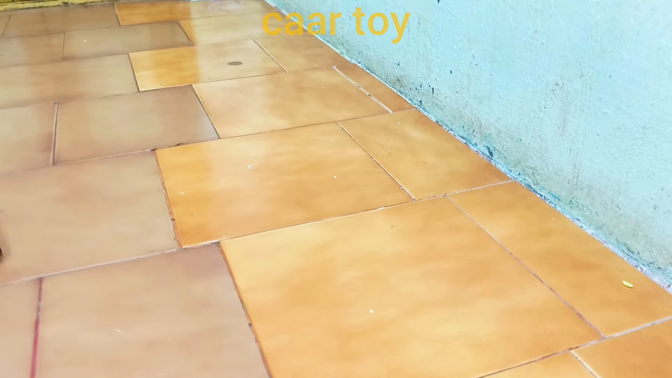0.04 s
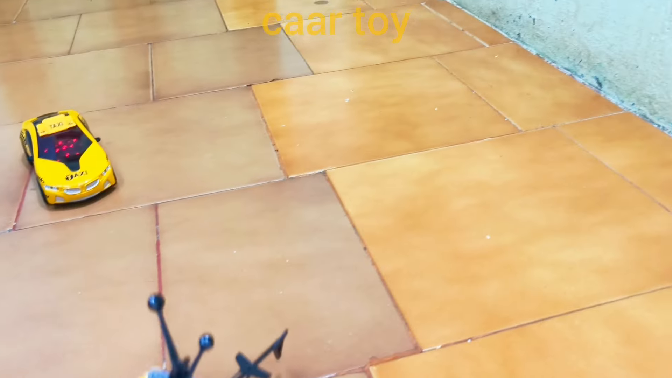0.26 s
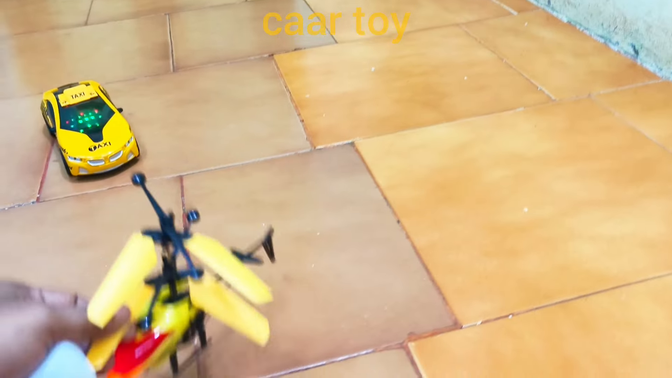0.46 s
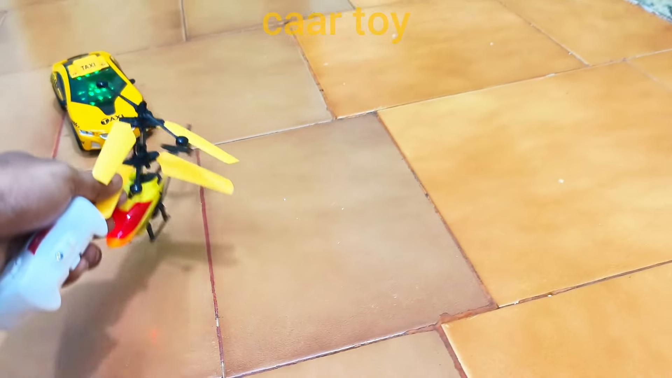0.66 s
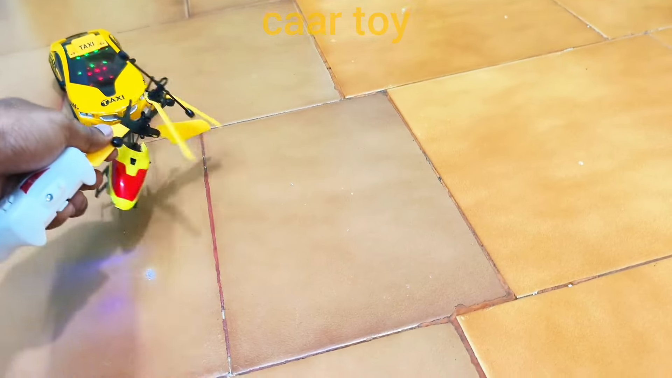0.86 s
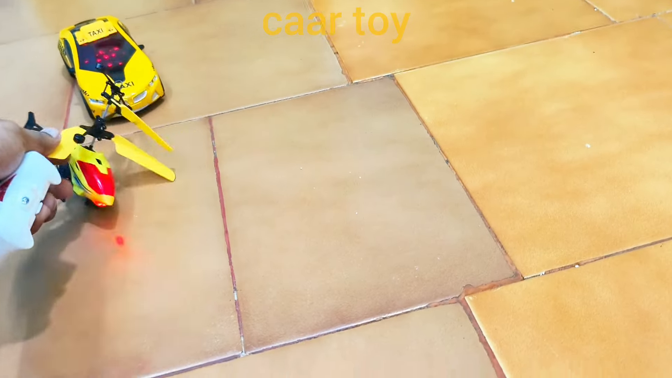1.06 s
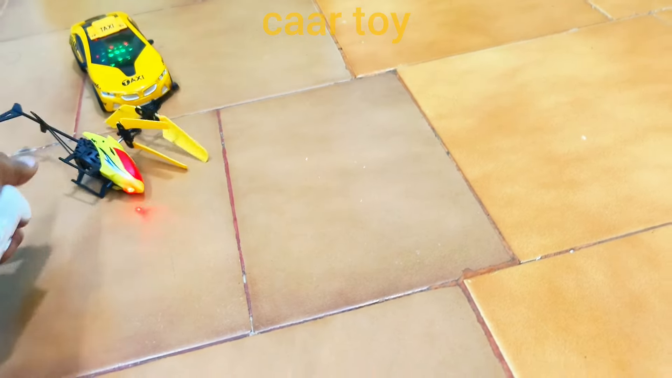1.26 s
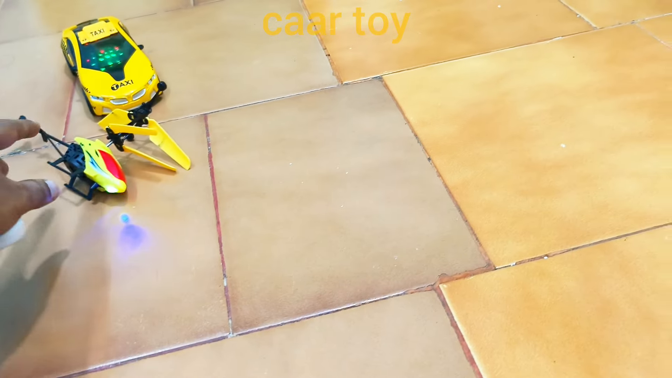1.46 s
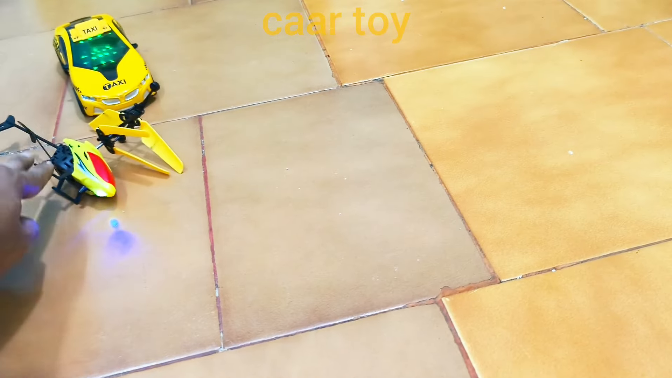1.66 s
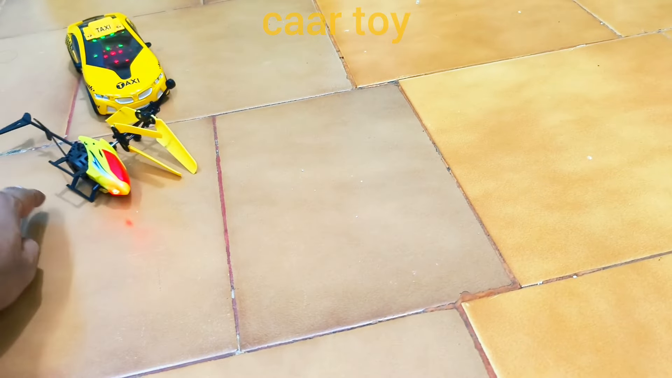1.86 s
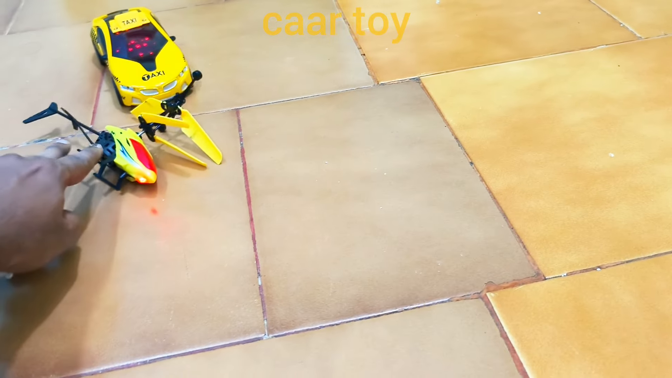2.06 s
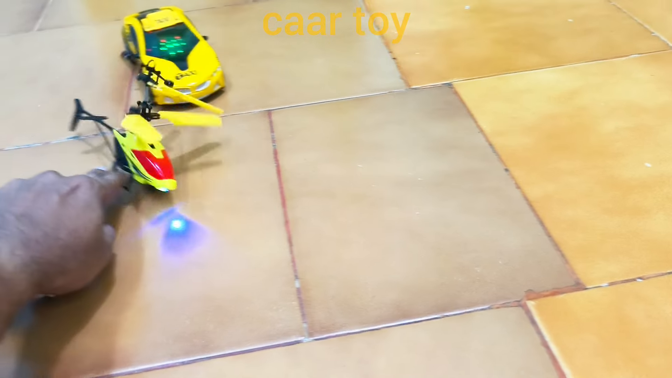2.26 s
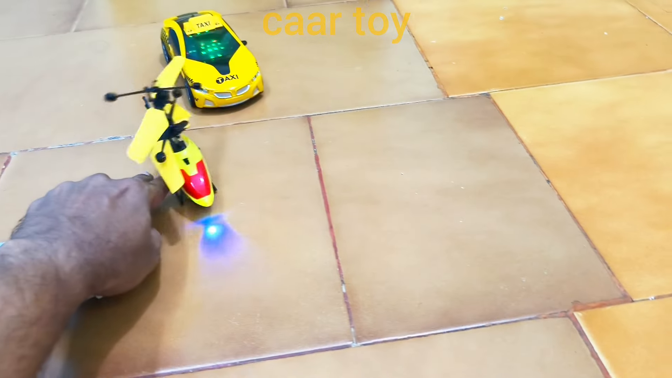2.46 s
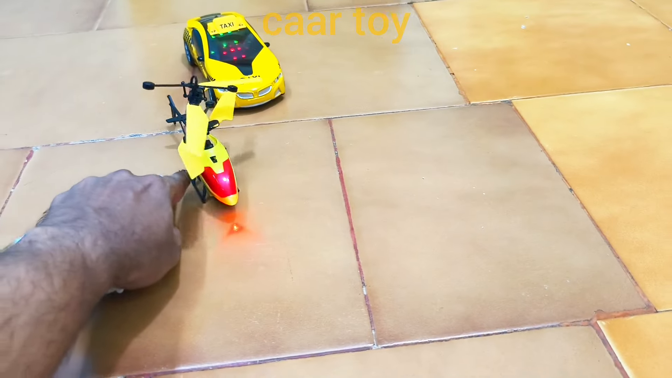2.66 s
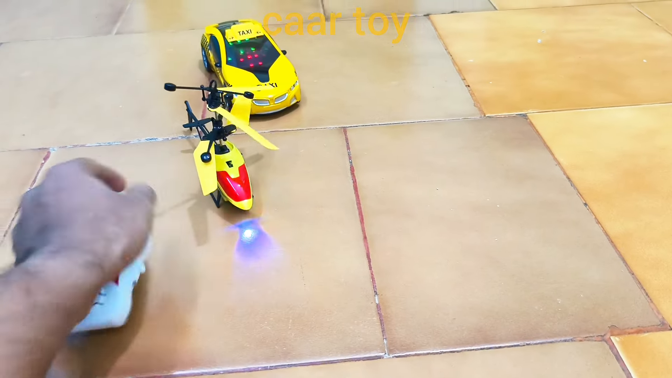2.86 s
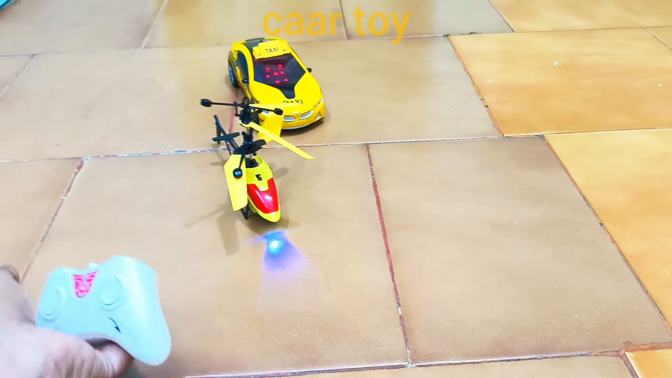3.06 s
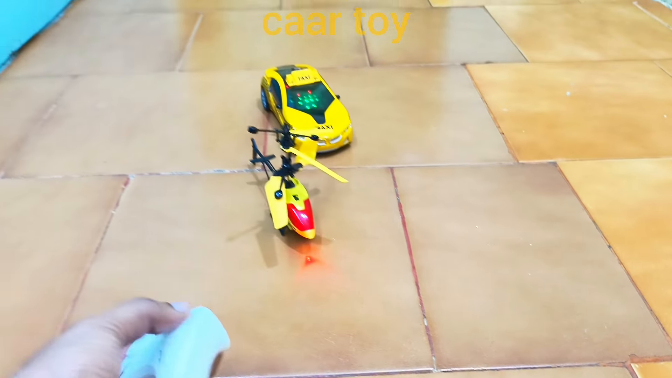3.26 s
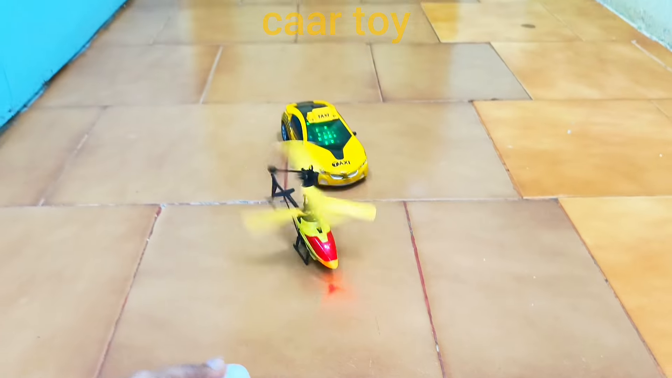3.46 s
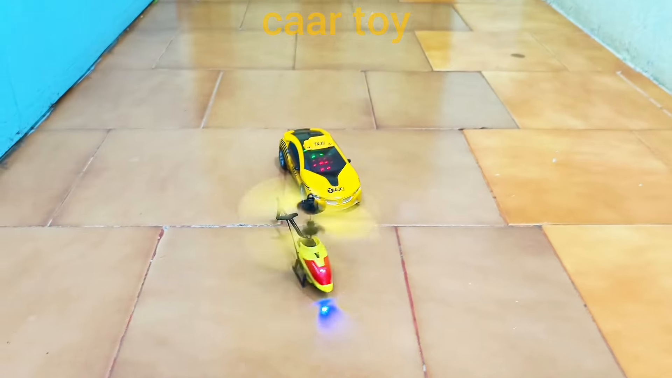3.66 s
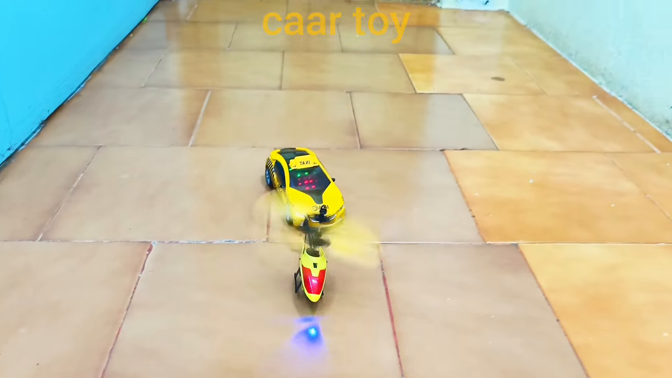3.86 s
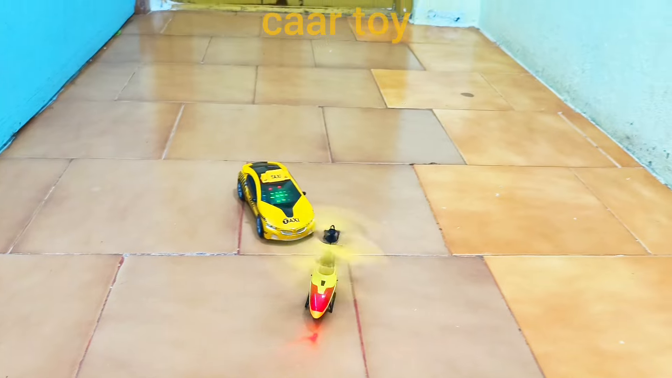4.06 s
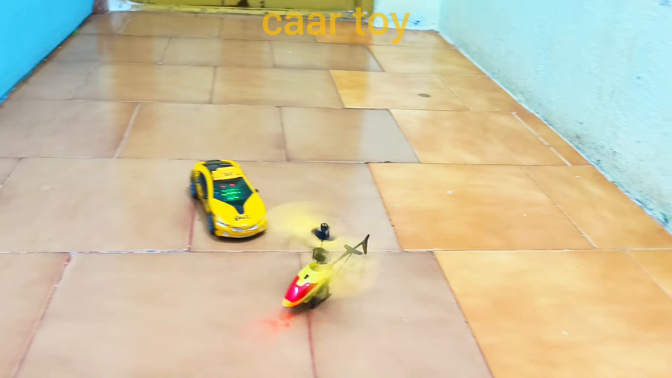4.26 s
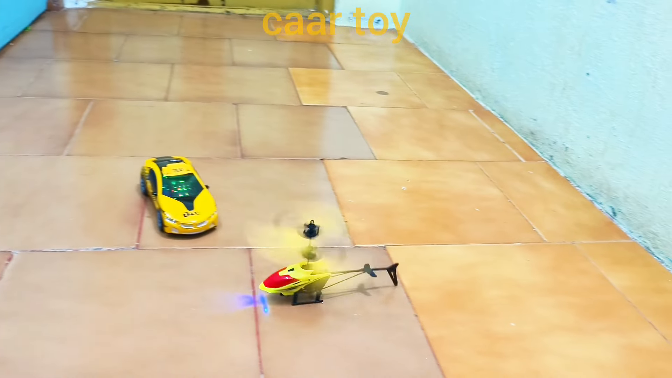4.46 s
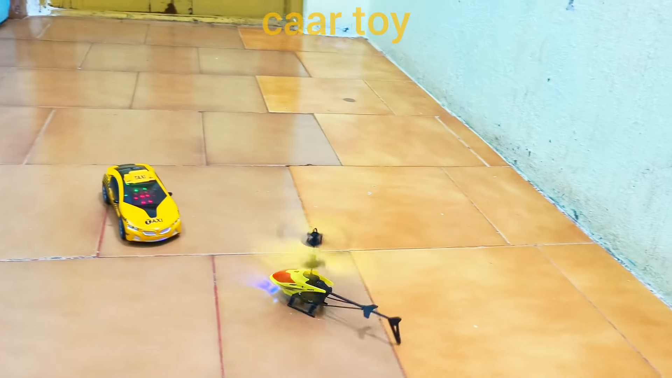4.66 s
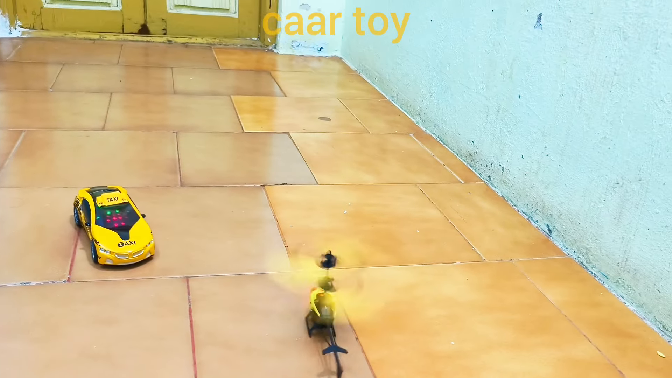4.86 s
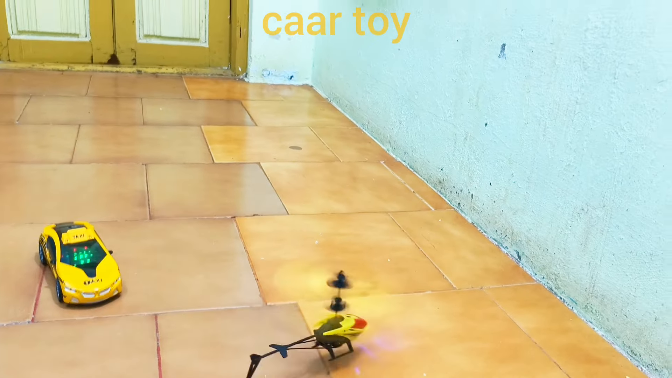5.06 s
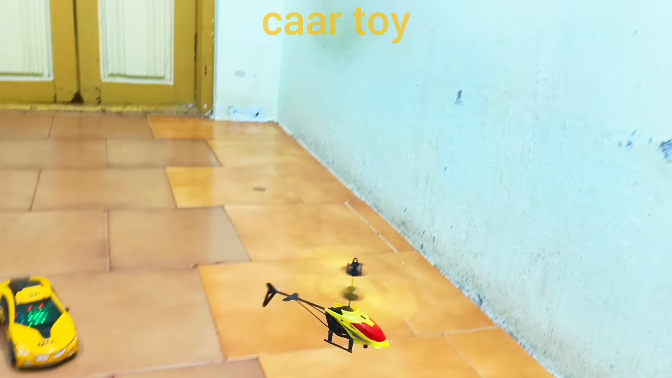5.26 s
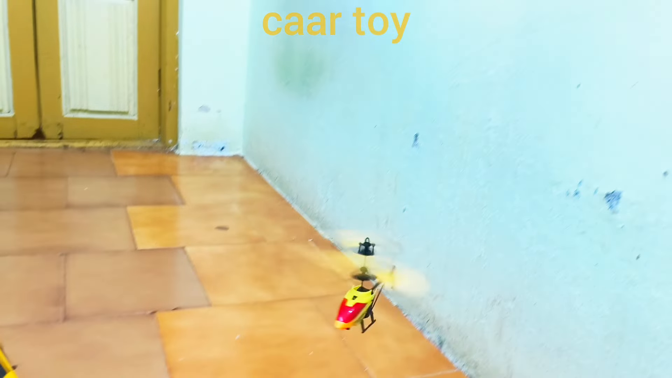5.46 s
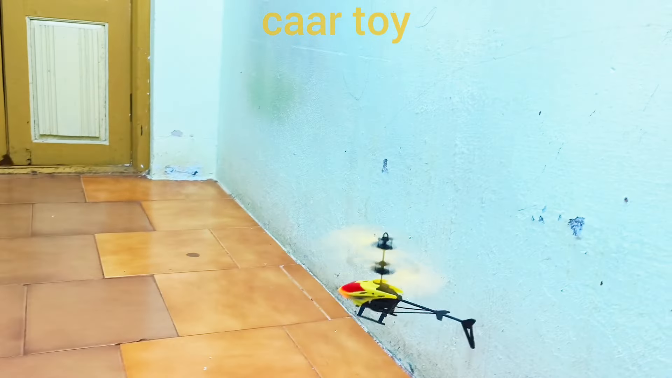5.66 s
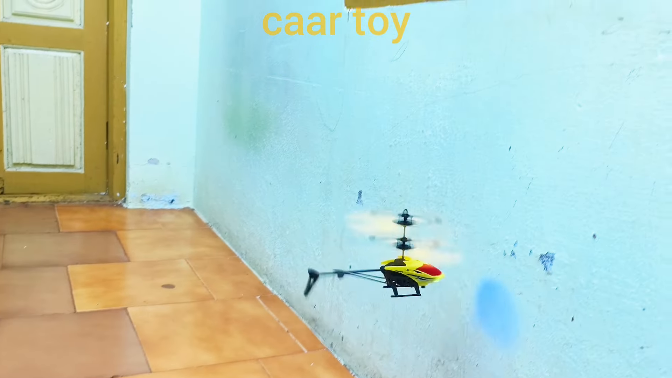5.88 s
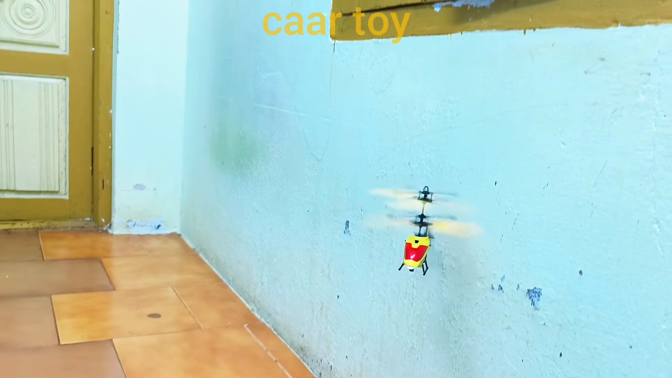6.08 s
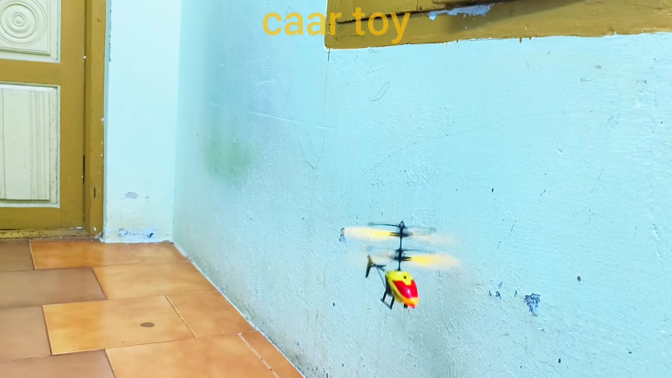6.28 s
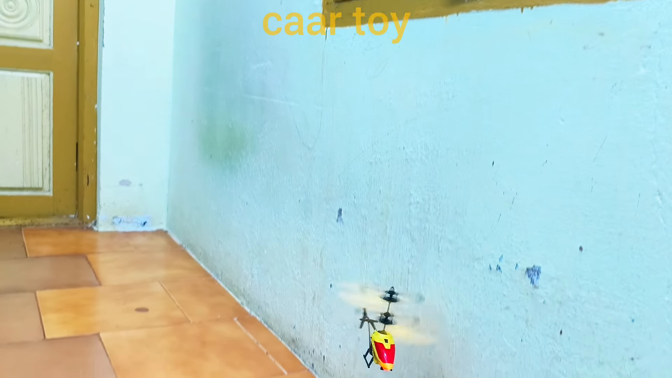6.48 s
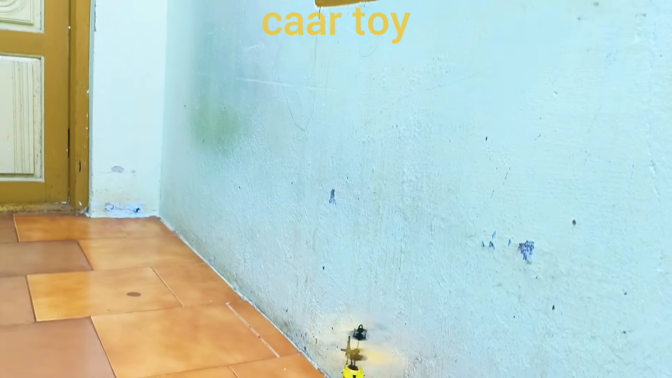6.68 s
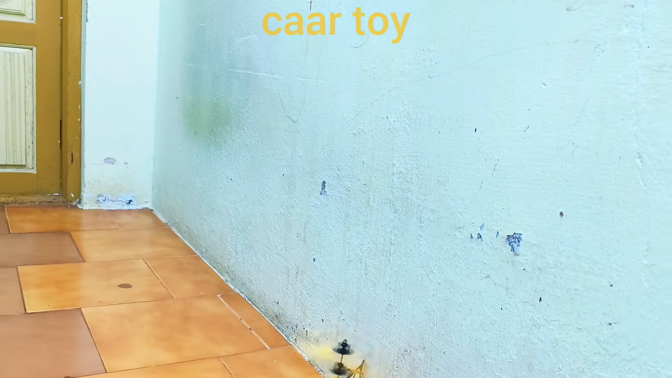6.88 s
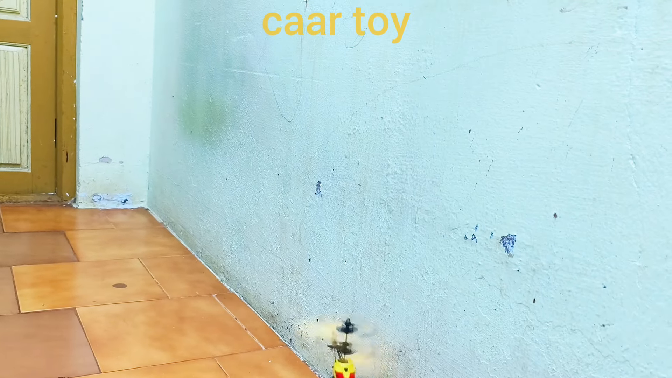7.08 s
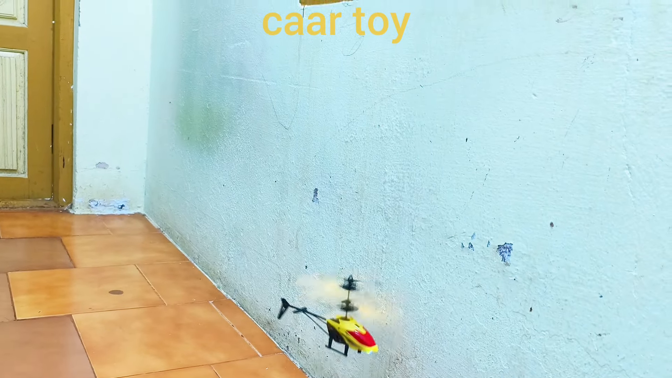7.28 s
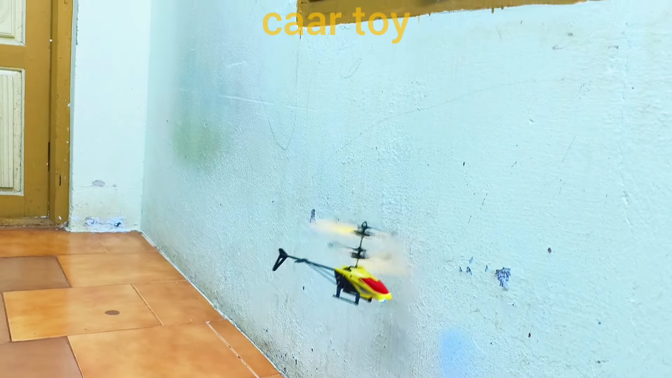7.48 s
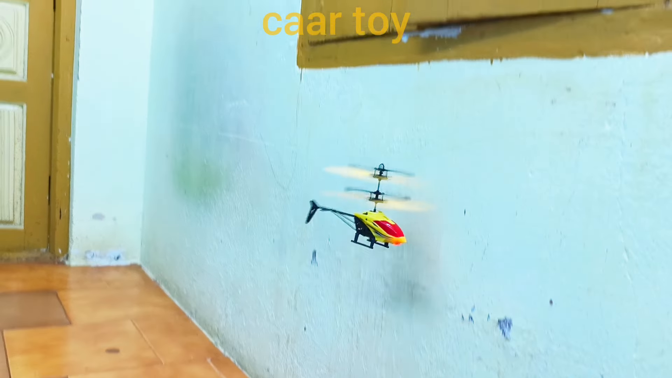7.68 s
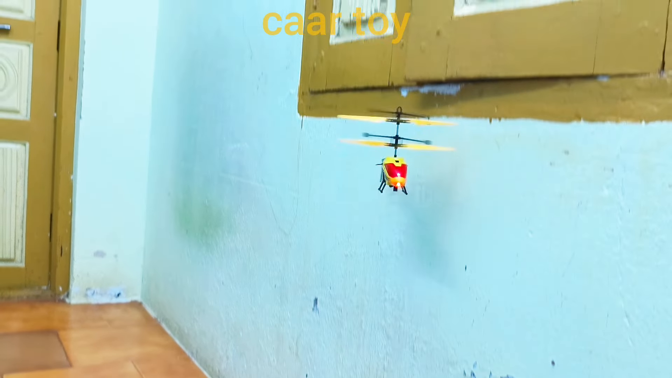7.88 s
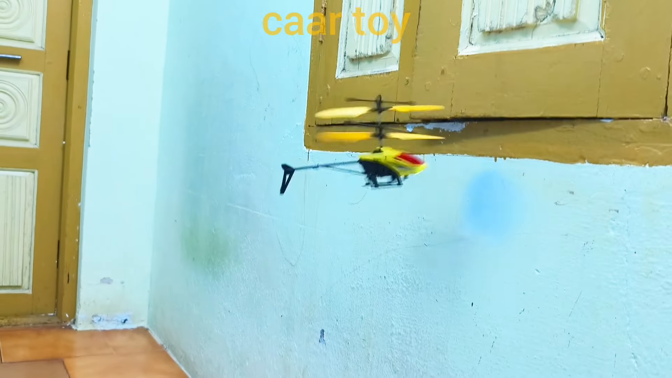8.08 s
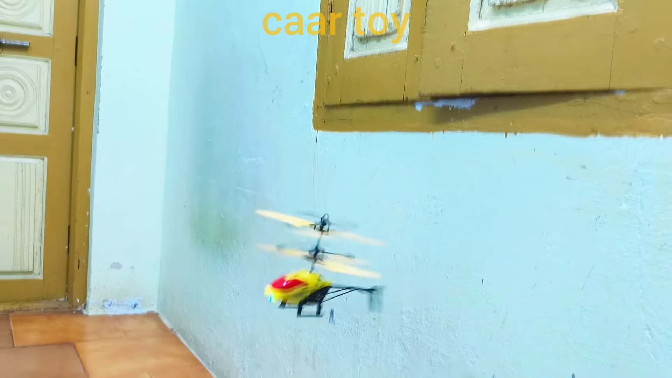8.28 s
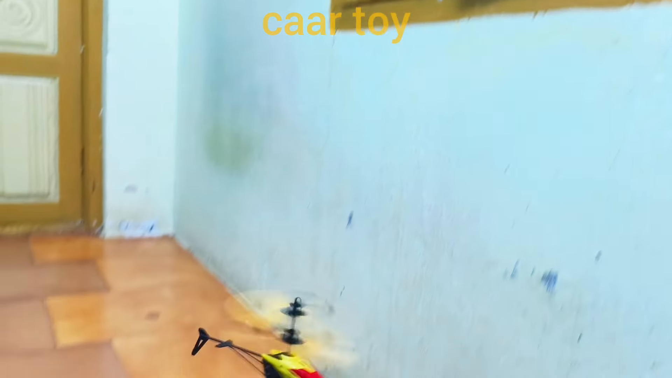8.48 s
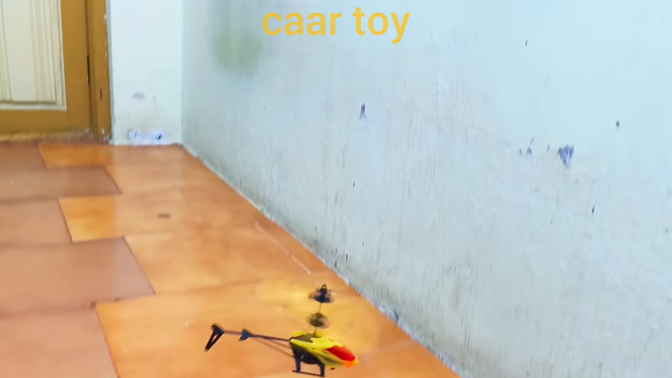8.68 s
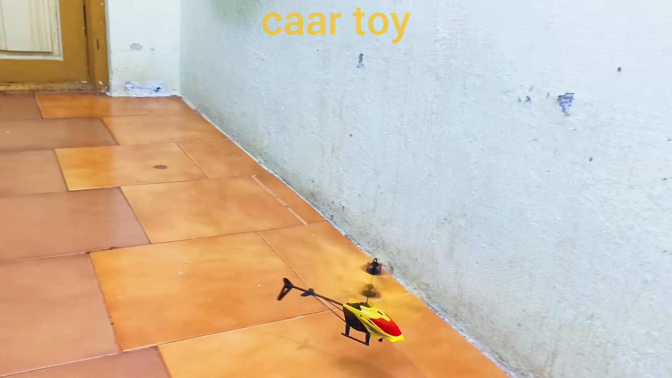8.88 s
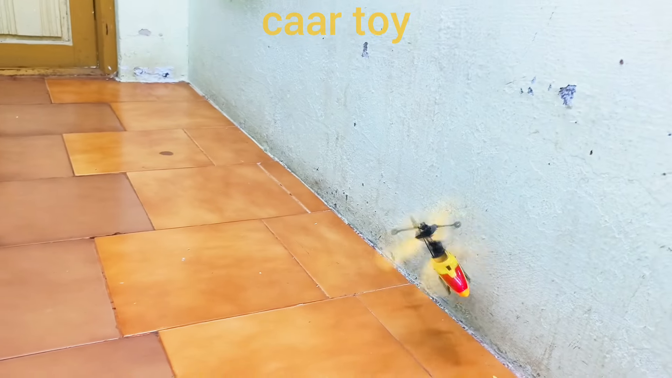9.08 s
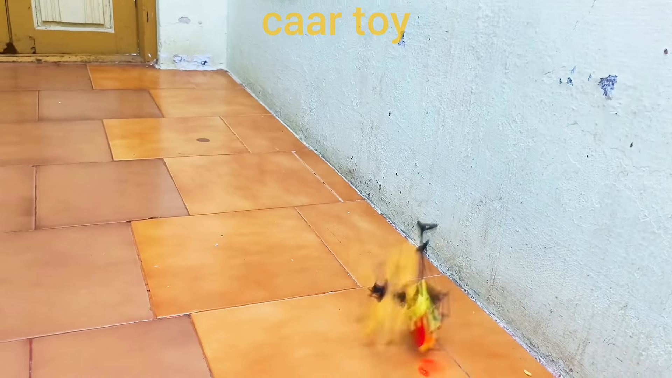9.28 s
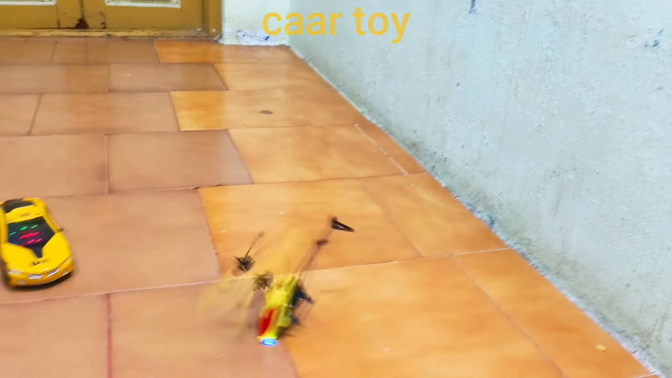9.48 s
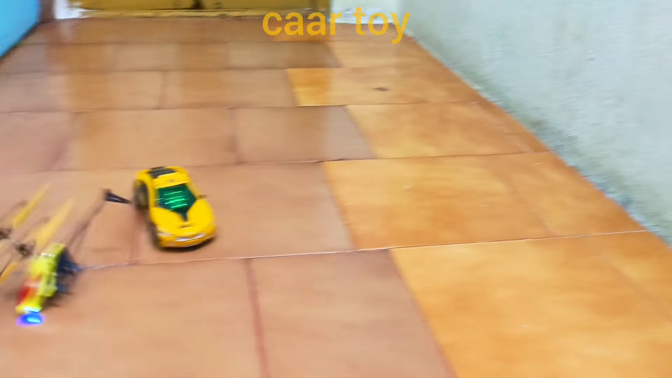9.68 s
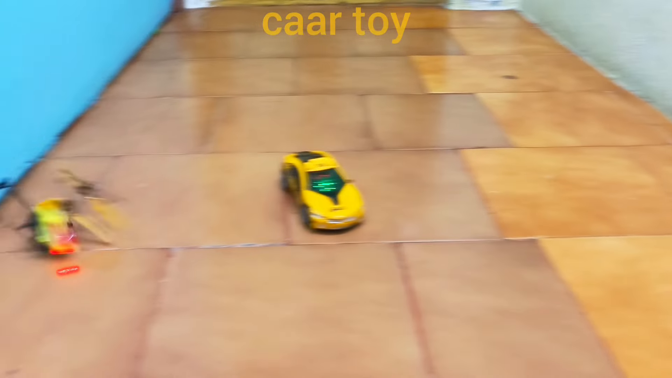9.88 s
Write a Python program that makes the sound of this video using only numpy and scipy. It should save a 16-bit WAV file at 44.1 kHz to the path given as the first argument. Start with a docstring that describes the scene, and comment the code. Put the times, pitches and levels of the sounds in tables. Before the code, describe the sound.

A toy helicopter is handled with plastic clicks, then whines and chatters in surges, its blades striking a wall before it crashes.

```python
"""Toy helicopter in a bare corridor

A toy helicopter is set down and handled on a tiled floor, then spins up and hovers in surges.
Two small motors drive the rotors through plastic gears that whine and chatter. The blades tick
against the wall, strike a shutter and the floor, and the toy tumbles in close at the end.
A low hum and a few far knocks fill the house."""
import sys
import numpy as np
from scipy import signal
from scipy.fft import rfft, irfft, next_fast_len
from scipy.io import wavfile

SR = 44100
rng = np.random.default_rng(int(sys.argv[2]) if len(sys.argv) > 2 else 0)


def persist_wave(psi):
    """Save psi, clipped to +-1, as 16-bit WAV."""
    counts = np.round(np.clip(psi, -1, 1) * 32767).astype(np.int16)
    wavfile.write(sys.argv[1], SR, np.atleast_2d(counts).T)


N = 437913
T = np.arange(N) / SR

START_S, PINION_TEETH, GEAR_RATIO = 3.44, 8, 5.7
# whine and buzz over the gear level, and their change with shaft rate
WHINE_DB, WHINE_DB_PER_HZ, STRAIN_DB_PER_HZ = 3.2, .04, .05
BUZZ_DB, BUZZ_DB_PER_HZ = -12.5, -0.064
# backlash roughens the whine; within about TIGHT_HZ of top speed the teeth stay pressed and whistle
LOOSE_SHARE, TIGHT_SHARE, TIGHT_HZ, TIGHT_DB = .73, .2, 3.5, 3.8
# fader ride of the gear train: time_s, level_db
GEAR_FADER = [(3.42, -38), (3.5, -29.5), (3.65, -22.5), (3.85, -27.5), (4.4, -25.5), (6.2, -28), (7.7, -28),
              (8.45, -32.7), (9.5, -32), (9.93, -30.5)]
# steering, upper motor's speed over the lower's: time_s, speed_ratio
STEERING = [(3.85, 1.01), (4.3, 1.126), (4.85, 1.09), (5.15, 1.025), (5.75, 0.99), (6.2, 1.02), (6.55, .98),
            (8.6, 1.003), (9.05, 0.99), (9.6, 1.03)]
# how the airframe radiates the whine: freq_hz, gain_db
AIRFRAME_EQ = [(900, -3.5), (1300, -8.5), (1750, -7), (2100, -10), (2600, 4), (3300, 0.5), (3900, -8),
               (4550, -0.5), (5800, -9.5), (7500, 6.5), (9100, 0.5), (11500, 0), (14000, -4.5)]
# bright chatter of the teeth: freq_hz, gain_db
CHATTER_EQ = [(3000, -21), (3500, -8.5), (5000, -0.5), (6200, 5), (7600, 4), (9700, 5), (11800, -1),
              (14300, 11.5), (16000, 2.5)]
# midrange buzz of the teeth: freq_hz, gain_db
BUZZ_EQ = [(1000, -23), (1600, -3.5), (2100, -7.5), (2500, 2), (2850, -2.5), (3150, -13), (4000, -10)]


def helicopter():
    """Two motors run a little apart; their gears whine and chatter while the blades stir the air."""
    hz, strain_hz, extra_db = motor_speed()
    (split,), (gear_db,) = curves(STEERING), curves(GEAR_FADER)
    from_full_hz = hz - hz.max()
    tight = np.exp(from_full_hz / TIGHT_HZ)
    slack = np.clip(LOOSE_SHARE + (TIGHT_SHARE - LOOSE_SHARE) * tight, 0, 1)
    whine_db = gear_db + extra_db + WHINE_DB + WHINE_DB_PER_HZ * from_full_hz
    whine_db += STRAIN_DB_PER_HZ * strain_hz + TIGHT_DB * tight
    # turns made by each motor shaft
    lower = np.cumsum(hz * (1 + .004 * slack * walk(14))) / SR
    upper = np.cumsum(hz * split * (1 + .004 * slack * walk(10))) / SR
    tones = undb(whine_db) * colour(whine(lower, slack) + undb(-4.5) * whine(upper, slack), AIRFRAME_EQ)
    teeth = tooth_clicks(lower, scatter_db=4.5, throb=0.37)
    teeth += tooth_clicks(upper, scatter_db=5.0, throb=0.067)
    teeth = unit(teeth) + undb(-14.5) * (clatter(lower) + clatter(upper))
    chatter = undb(gear_db + .5) * colour(teeth, CHATTER_EQ)
    buzz = undb(gear_db + BUZZ_DB + BUZZ_DB_PER_HZ * from_full_hz) * colour(teeth, BUZZ_EQ)
    wash = blade_wash(lower / GEAR_RATIO, from_full_hz)
    # a low tone sings along near top speed
    low_tone = undb(-52 + 3 * walk(4)) * (hz / hz.max()) ** 8 * np.sin(2 * np.pi * lower * 8 / 3)
    power = np.clip((T - START_S) / 0.003, 0, 1)
    toy = power * (tones + chatter + buzz + wash + drones() + low_tone)
    direct_whine = undb(-17) * power * tones
    return corridor(toy, wet_db=8.5, tails=4) + direct_whine


FIRST_HZ, INERTIA_S = 50, .107  # shaft rate at switch-on; lag of the rotors
# the shutter jam and a 0 dB strike each pull the target rate down for BRAKE_S
JAM_S, JAM_LOSS_HZ, STRIKE_LOSS_HZ, BRAKE_S = 8.046, 117, 25, .07
# throttle moves: start_s, target_shaft_hz, extra_whine_db
THROTTLE_CUES = [(3.439, 119.9, -2), (3.589, 200, .5), (3.84, 178, -1), (3.94, 155, -1.5),
                 (4.325, 172, -1.5), (4.943, 215.5, 0), (5.36, 172, -3), (5.52, 217.5, 2.5), (5.83, 207, 0),
                 (5.99, 162, -2), (6.365, 218, -2.5), (7.82, 200, -3), (7.95, 175, -2), (8.118, 147.6, 1),
                 (8.264, 219.2, 0), (9.093, 182, 0), (9.247, 204, -3), (9.74, 174, -2)]


def motor_speed():
    """Shaft rate trails the throttle and strikes brake it; gives rate, climb still to go, extra whine."""
    starts, targets_hz, extras_db = np.transpose(THROTTLE_CUES)
    step = np.searchsorted(starts, T)
    target_hz = np.r_[FIRST_HZ, targets_hz][step]
    brakes = [(JAM_S, JAM_LOSS_HZ)] + [(s, STRIKE_LOSS_HZ * undb(db)) for s, _, db, _, _ in ROTOR_HITS]
    braking_hz = sum(loss * ((T > s) & (T < s + BRAKE_S)) for s, loss in brakes)
    hz = lag(target_hz - braking_hz, INERTIA_S)
    strain_hz = lag(np.maximum(target_hz - hz, 0), INERTIA_S)
    return hz, strain_hz, lag(np.r_[0, extras_db][step], INERTIA_S)


# each motor's partials: shaft_multiple (played rounded), level_db, skirt_width_hz, clean_core_db
WHINE_PARTIALS = [(8, -7, 27, 1), (13, -18, 45, -1), (16, -11.5, 18.6, -2), (20.7, 2.5, 240, .5),
                  (22, -12, 150, 1), (41, -3, 450, -6), (42, 1.5, 200, 3.5), (44, -0.5, 1600, -6),
                  (63, 0.5, 410, 1.5)]


def whine(turns, slack):
    """Multiples of the shaft rate; backlash smears each into a rough skirt, the high ones most."""
    out = 0
    for order, db, width_hz, core_db in WHINE_PARTIALS:
        phase = 2 * np.pi * round(order) * turns
        rough = slack ** (24 / order)
        core = undb(core_db) * np.sqrt(2 * (1 - rough)) * np.sin(phase)
        skirt = np.sqrt(rough) * (walk(width_hz) * np.sin(phase) + walk(width_hz) * np.cos(phase))
        out = out + undb(db) * (core + skirt)
    return out * undb(1.14 * walk(7.4))


def tooth_clicks(turns, scatter_db, throb):
    """A click of random size as each tooth lands and leaves, harder each time a blade comes round."""
    landings = np.diff(np.floor(2 * PINION_TEETH * turns), prepend=0)
    size = rng.standard_normal(N) * undb(scatter_db * walk(217))
    return landings * size * (1 + throb * np.sin(4 * np.pi * turns / GEAR_RATIO))


def clatter(turns, harmonics=72, size=4096):
    """Flaws of brushes and teeth come round again on every turn: a comb of harmonics."""
    flaws = irfft(np.r_[0, rng.standard_normal(harmonics) + 1j * rng.standard_normal(harmonics)], size)
    return unit(np.interp(turns % 1 * size, np.arange(size), flaws))


# fader ride of the blade air, as at top speed: time_s, level_db
WASH_FADER = [(3.8, -50.5), (4.9, -48.5), (5.25, -45), (5.8, -48), (6.3, -45.5), (7.05, -40.5), (8.5, -54),
              (9.1, -49.5), (9.7, -55.5)]
# tone of the rushing air: freq_hz, gain_db
WASH_EQ = [(150, -32), (320, 1), (600, 6), (1100, 10.5), (1600, -16), (2600, 9.5)]


def blade_wash(rotor_turns, from_full_hz, db_per_hz=.1):
    """Air thrown by the blades pulses twice a turn and fades as the motors slow."""
    (level_db,) = curves(WASH_FADER)
    blade_pass = 1 + .4 * np.sin(4 * np.pi * rotor_turns)
    air = rng.standard_normal(N) * blade_pass + 0.34 * clatter(rotor_turns)
    return undb(level_db + db_per_hz * from_full_hz) * colour(air, WASH_EQ)


# downwash swells: start_s, end_s, pitch_hz, level_db
DRONE_CUES = [(4.1, 4.92, 144, -48), (5.65, 6.85, 325, -52), (6.55, 6.95, 160, -53)]


def drones():
    """The downwash drones in low wavering tones near floor and wall."""
    out = 0
    for start, end, hz, db in DRONE_CUES:
        flutter = 1 + 1.6 * walk(20)
        phase = 2 * np.pi * np.cumsum(hz * (1 + 0.05 * walk(12.95))) / SR
        out = out + undb(db) * swell(start, end, attack_s=0.36, release_s=0.084) * flutter * np.sin(phase)
    return out


BLADE_GAP_S, BLADE_FADE_DB = .0185, -1  # from one blade's blow to the next
# rotor hits: start_s, blade_count, level_db, thud_offset_db, shell_offset_db
ROTOR_HITS = [(6.202, 1, -4, -42, -22), (6.601, 2, -3.5, -35.5, -19.5), (7.094, 1, -7, -39, -19),
              (7.271, 1, -9.5, -37.5, -19.5), (7.565, 1, -9, -41, -26), (7.859, 1, -10.5, -43, -20),
              (8.047, 3, -3, -32, -15), (9.096, 1, -7.5, -39, -21), (9.108, 2, -4.5, -33, -20),
              (9.193, 2, -11.5, -31.5, -20), (9.343, 1, -10, -27.5, -32), (9.355, 2, -3.5, -36, -17),
              (9.838, 1, -6, -20.5, -15), (9.862, 3, -2, -21, -19)]
# bright crack of plastic: freq_hz, width_hz, gain_db
CRACK_MODES = [(4215, 1260, -0.5), (7100, 4250, 2.5), (9950, 1140, 0), (13600, 5700, 0)]
# ring of the shell: freq_hz, width_hz, gain_db
SHELL_MODES = [(1805, 510, -7.5), (1925, 270, -1), (2480, 1400, -2)]
# low body of a hit: freq_hz, width_hz, gain_db
THUD_MODES = [(303, 150, -1.5), (509, 163, 1), (910, 1000, -7)]
# wooden shutter: freq_hz, width_hz, gain_db
SHUTTER_MODES = [(770, 360, -11), (1180, 210, -7), (1360, 171, -5), (1633, 384, -4), (1955, 120, -3)]


def crashes():
    """Blade after blade hits wall, shutter or floor; the shutter rings in the jam and the toy scrapes."""
    hits = [(start + k * BLADE_GAP_S, level + k * BLADE_FADE_DB, thud, shell)
            for start, blades, level, thud, shell in ROTOR_HITS for k in range(round(blades))]
    starts, db, thud_db, shell_db = np.transpose(hits)
    layers = [(db - 1, CRACK_MODES), (db + shell_db + 7, SHELL_MODES), (db + thud_db + 12, THUD_MODES)]
    blows = sum(ring(contacts(starts, level, snap_s=0.0015, rattle_s=.016, rattle_db=-10.5), modes)
                for level, modes in layers)
    jammed = starts[np.abs(starts - JAM_S) < BRAKE_S]
    jam = contacts(jammed, levels_db=np.full(len(jammed), -14.5),
                   snap_s=0.007, rattle_s=0.024, rattle_db=-12)
    return corridor(blows + ring(jam, SHUTTER_MODES) + scrapes(), wet_db=6.5, tails=2)


# slides at spin-up and after the fall: start_s, end_s, level_db
SCRAPE_CUES = [(3.45, 3.5, -41), (3.595, 3.655, -32), (9.366, 9.386, -16.5), (9.497, 9.61, -31)]


def scrapes():
    """The shell rasps as it slides over the tiles."""
    slips = rng.standard_normal(N) * undb(2.4 * walk(80))
    sliding = sum(undb(db) * swell(start, end, attack_s=0.011, release_s=0.013)
                  for start, end, db in SCRAPE_CUES)
    return sliding * unit(ring(slips, [(2330, 440, -2.5), (2640, 670, -3)]))


# plastic handling clicks: start_s, level_db, shell_offset_db
CLICK_CUES = [(0.8672, -26, -9), (0.9188, -28.5, -18), (1.0243, -30.5, -11), (1.0494, -27, -8),
              (1.115, -27, -13), (1.2312, -21, -24), (1.2496, -28, -16), (1.284, -16.5, -22),
              (1.3518, -22, -27), (1.3933, -27, -32), (1.7598, -39.5, -16), (1.826, -30, -10),
              (1.852, -32, -1), (2.2606, -23, -20), (2.327, -33, -6), (2.379, -16.5, -15),
              (2.554, -27, -15), (2.6552, -27.5, -18), (3.4458, -22, -8)]
# thin skids ringing on: freq_hz, width_hz, gain_db
SKID_MODES = [(4440, 26, 3), (2394, 70, -4)]
# cabin meeting the tiles: start_s, level_db
CABIN_CUES = [(1.853, -29.5), (2.328, -32.5)]
# hollow of the cabin: freq_hz, width_hz, gain_db
CABIN_MODES = [(800, 130, -9), (907, 90, -1.5), (1000, 80, 2), (1110, 390, -2.5)]
# small dry ticks close by: start_s, level_db
TICK_CUES = [(0.153, -45), (2.981, -49), (3.33, -51), (3.426, -25.5)]


def handling():
    """Plastic parts click, shell and skids ring, and the hollow cabin knocks on the tiles."""
    starts, db, shell_db = np.transpose(CLICK_CUES)
    layers = [(db - 3, CRACK_MODES), (db + shell_db + 7, SHELL_MODES), (db - 17.5, SKID_MODES)]
    clicks = sum(ring(contacts(starts, level, snap_s=0.0011, rattle_s=0.03, rattle_db=-14), modes)
                 for level, modes in layers)
    starts, db = np.transpose(CABIN_CUES)
    cabin = ring(contacts(starts, db + 9.5, snap_s=0.0026, rattle_s=.03, rattle_db=-32), CABIN_MODES)
    starts, db = np.transpose(TICK_CUES)
    taps = contacts(starts, db - 2, snap_s=0.0018, rattle_s=0.0043, rattle_db=-21)
    ticks = ring(taps, CRACK_MODES + SHELL_MODES)
    return corridor(clicks + cabin, wet_db=4) + corridor(ticks, wet_db=-5)


# soft bumps: start_s, level_db, pitch_hz
BUMP_CUES = [(0.209, -42, 86), (0.369, -32.5, 66), (0.654, -30.5, 66), (0.96, -36, 68), (1.231, -28.5, 64),
             (1.379, -38, 55), (2.53, -35, 62), (8.079, -28, 168), (9.849, -22, 62), (9.875, -23, 225)]


def bumps(rise_s=0.023):
    """Low thuds of handling, then of the toy hitting the shutter and tumbling to the floor."""
    out, age = np.zeros((2, N + SR)), T[:SR // 2] / rise_s
    for start, db, hz in BUMP_CUES:
        noise = rng.standard_normal(len(age)) + 0.25 * rng.standard_normal((2, len(age)))
        band = signal.butter(2, [hz / 1.45, hz * 1.44], "band", fs=SR, output="sos")
        rumble = unit(signal.sosfilt(band, noise))
        at = int(start * SR)
        out[:, at:at + len(age)] += undb(db - 8) * rumble * age * np.exp(1 - age)
    return out[:, :N] * undb([[2.5], [-2.5]])


# dull knocks elsewhere in the house: start_s, level_db
KNOCK_CUES = [(3.6476, -29.5), (4.8927, -29), (5.0978, -19), (5.6955, -25), (7.6305, -24)]


def knocks():
    """Far knocks arrive mostly as reverberation."""
    starts, db = np.transpose(KNOCK_CUES)
    force = contacts(starts, db - 7.5, snap_s=0.0097, rattle_s=0.025, rattle_db=-13)
    return corridor(ring(force, [(1180, 540, 0)]), wet_db=3.0)


# dull room tone: freq_hz, gain_db
ROOM_TONE_EQ = [(15, -62), (25, -19), (91, -4.5), (156, -9.5), (221, -9.5), (267, -17), (322, -13.5),
                (648, -16.5), (741, -25), (1270, -26), (3530, -35.5), (6380, -42.5), (15500, -54)]
# hum of the house: pitch_hz, level_db
HUM_TONES = [(100, -58), (146, -67), (168, -57)]


def house(room_tone_db=-54):
    """A bed of room tone and wavering hum, partly alike on both sides."""
    sway = undb(.7 * walk(2))
    noise = rng.standard_normal(N) + 0.77 * rng.standard_normal((2, N))
    bed = colour(noise, ROOM_TONE_EQ) * undb(room_tone_db) * sway
    for hz, db in HUM_TONES:
        level = undb(db + 2 * walk(3)) * np.sqrt(2)
        phase_drift = 0.16 * np.array([walk(5.6), walk(2.6)])
        bed += level * np.sin(2 * np.pi * hz * T + phase_drift)
    return bed


ROOM_T60_S, ROOM_TREBLE_T60_S = 0.37, 0.27


def corridor(x, wet_db, tails=1):
    """Direct sound plus diffuse stereo reverb; a moving source drifts among several tails."""
    t = T[:int(.7 * SR)]
    places = np.array([walk(2.87) for _ in range(tails)])
    shares = places / np.linalg.norm(places, axis=0) if tails > 1 else [1]
    wet = 0
    for share in shares:
        noise = rng.standard_normal((2, len(t)))
        low = signal.sosfilt(signal.butter(1, 4000, fs=SR, output="sos"), noise)
        tail = low * undb(-60 * t / ROOM_T60_S) + (noise - low) * undb(-60 * t / ROOM_TREBLE_T60_S)
        tail *= np.clip(t / 0.0018, 0, 1)
        tail /= np.linalg.norm(tail, axis=1, keepdims=True)
        wet = wet + signal.oaconvolve((x * share)[None], tail, axes=1)[:, :N]
    return (x + undb(wet_db) * wet) / np.sqrt(1 + undb(2 * wet_db))


def contacts(starts, levels_db, snap_s, rattle_s, rattle_db):
    """Each contact is a sharp snap followed by a fading rattle of loose parts."""
    force, t = np.zeros(N + SR), T[:SR // 4]
    for start, db in zip(starts, levels_db):
        snap, rattle, size = rng.standard_normal((3, len(t)))
        blow = snap * np.exp(-t / snap_s) + undb(rattle_db + 5.1 * size) * rattle * np.exp(-t / rattle_s)
        at = int(start * SR)
        force[at:at + len(t)] += undb(db) * blow
    return force[:N]


def ring(x, modes):
    """Pass x through resonances, each twice for dark valleys; an impulse keeps its energy."""
    kick = signal.unit_impulse(SR // 8)
    body = 0
    for k, (hz, width_hz, db) in enumerate(modes):
        b, a = signal.iirpeak(min(hz, .45 * SR), hz / width_hz, fs=SR)
        body = body + (-1) ** k * undb(db) * signal.lfilter(b, a, signal.lfilter(b, a, kick))
    return signal.oaconvolve(x, body / np.linalg.norm(body))[:N]


def colour(x, eq, skirt_db=24):
    """Shape x with an EQ curve, falling by skirt_db an octave beyond its ends; rms 1."""
    hz, db = np.transpose(eq)
    bins, size = np.arange(N // 2 + 1), next_fast_len(N)
    octave, known = np.log2(bins * SR / N + 1), np.log2(hz)
    beyond = np.abs(octave - np.clip(octave, known[0], known[-1]))
    curve = undb(np.interp(octave, known, db) - skirt_db * beyond)
    gain = np.interp(np.arange(size // 2 + 1) * N / size, bins, curve)
    return unit(irfft(rfft(x, size) * gain, size)[..., :N])


def walk(rate_hz):
    """Smooth random drift, low-passed at rate_hz; rms 1."""
    hop = 1 if rate_hz > 100 else 16
    lowpass = signal.butter(2, rate_hz, fs=SR / hop, output="sos")
    slow = signal.sosfilt(lowpass, rng.standard_normal(N // hop + 1))
    return unit(np.interp(T, np.arange(len(slow)) * hop / SR, slow) if hop > 1 else slow[:N])


def swell(start, end, attack_s, release_s):
    """Rise, hold until the end, then die away."""
    return np.clip((T - start) / attack_s, 0, 1) * np.exp(-np.maximum(T - end, 0) / release_s)


def lag(x, seconds):
    """Follow x with a first-order lag."""
    keep = np.exp(-1 / (seconds * SR))
    return x[0] + signal.lfilter([1 - keep], [1, -keep], x - x[0])


def curves(table):
    """The columns of a time table at every sample."""
    times, *columns = np.transpose(table)
    return [np.interp(T, times, column) for column in columns]


def undb(db):
    """Decibels to gain."""
    return 10 ** (np.asarray(db) / 20)


def unit(x):
    """Scale to rms 1."""
    return x / np.sqrt(np.mean(x ** 2) + 1e-20)


def scene():
    """Everything in the corridor."""
    return helicopter() + handling() + crashes() + knocks() + bumps() + house()


# stereo lean of the microphones: freq_hz, left_minus_right_db
MIC_BALANCE = [(60, -5.5), (110, 1.5), (200, -1.5), (380, 1), (700, -0.5), (1290, 0.0), (2380, -1),
               (4400, 3), (8120, -3.5), (15000, 17)]


def record(dry, top_hz=15900):
    """The two microphones differ in colour, most in the top octave; peaks are rounded, the top is cut."""
    hz, db = np.transpose(MIC_BALANCE)
    size = next_fast_len(N + SR // 8)
    lean_db = np.interp(np.arange(size // 2 + 1) * SR / size, hz, db)
    gain = undb(np.array([lean_db, -lean_db]) / 2)
    heard = irfft(rfft(dry, size) * gain / np.sqrt(np.mean(gain ** 2, axis=0)), size)[:, :N]
    rounded = .9 * np.tanh(heard / .9)
    return signal.sosfilt(signal.ellip(10, .2, 80, top_hz, fs=SR, output="sos"), rounded)


dry = scene()
out = record(dry)
persist_wave(out)
```